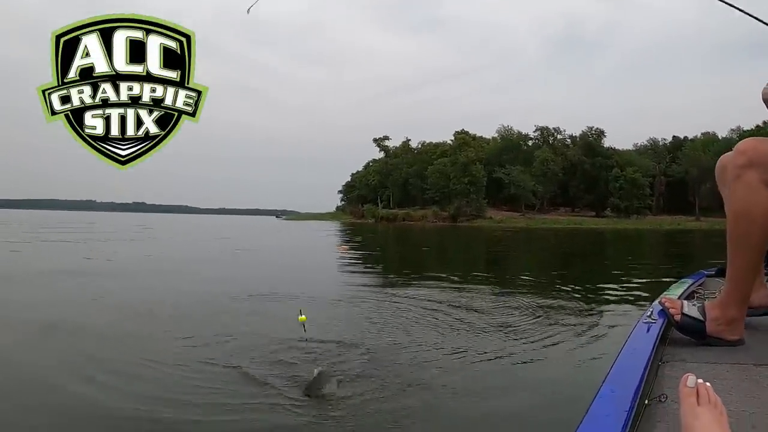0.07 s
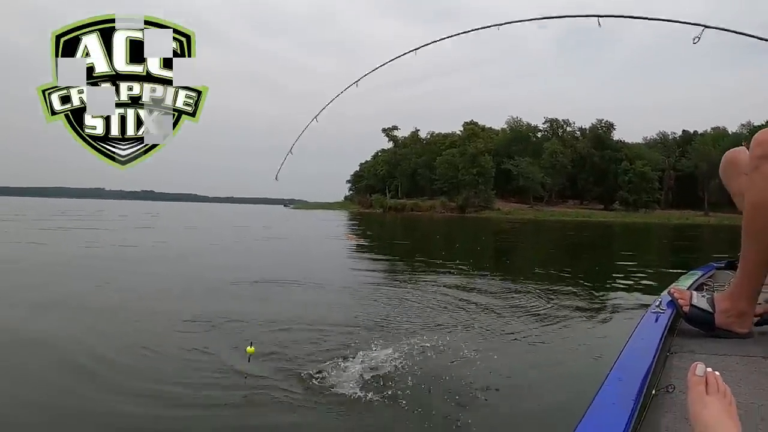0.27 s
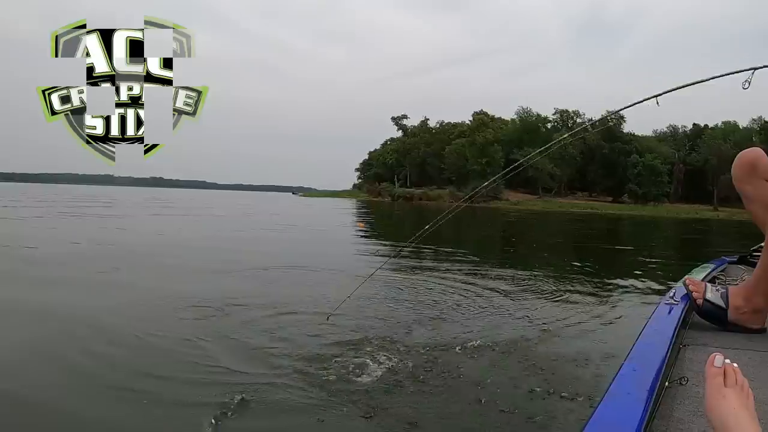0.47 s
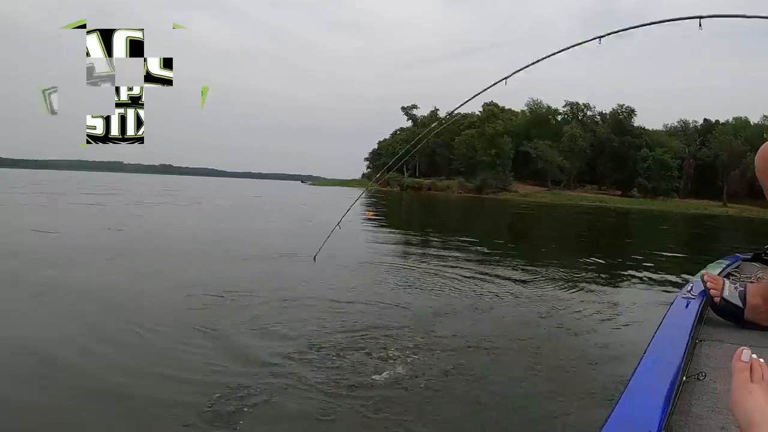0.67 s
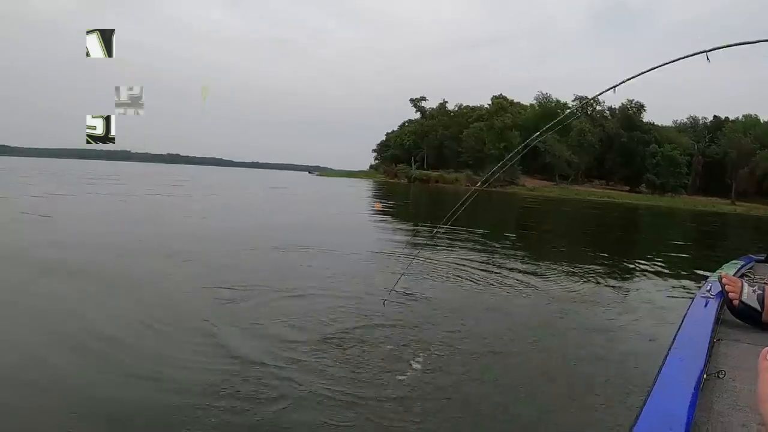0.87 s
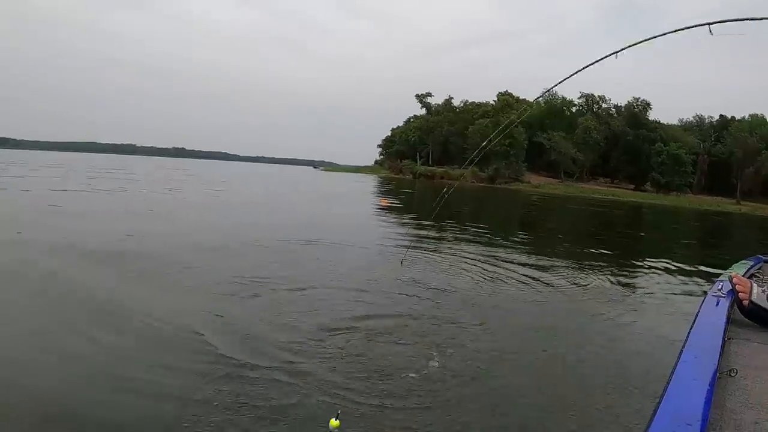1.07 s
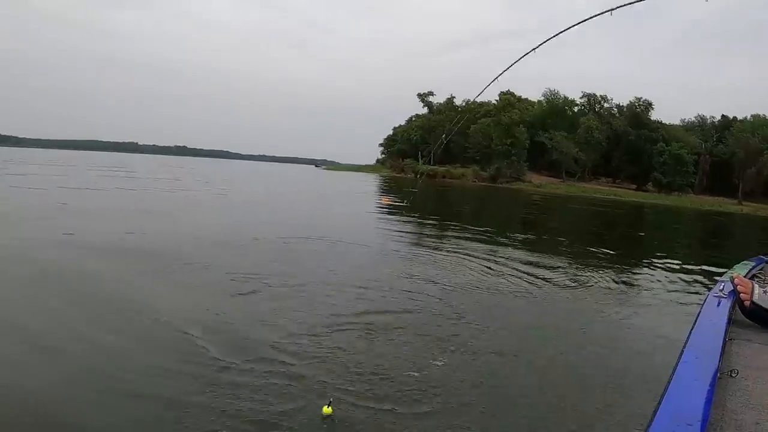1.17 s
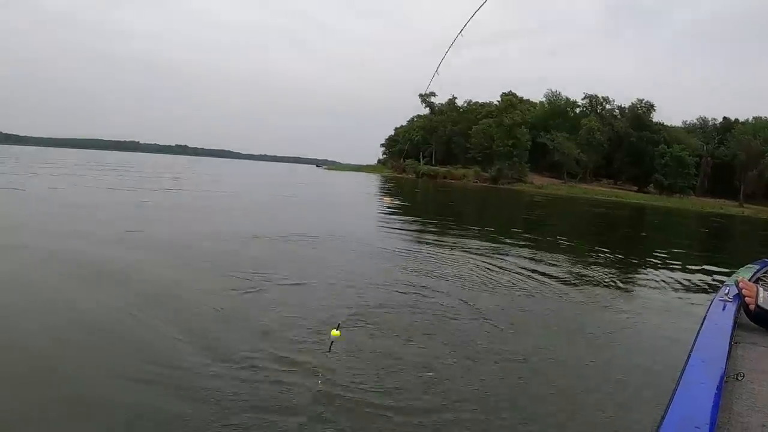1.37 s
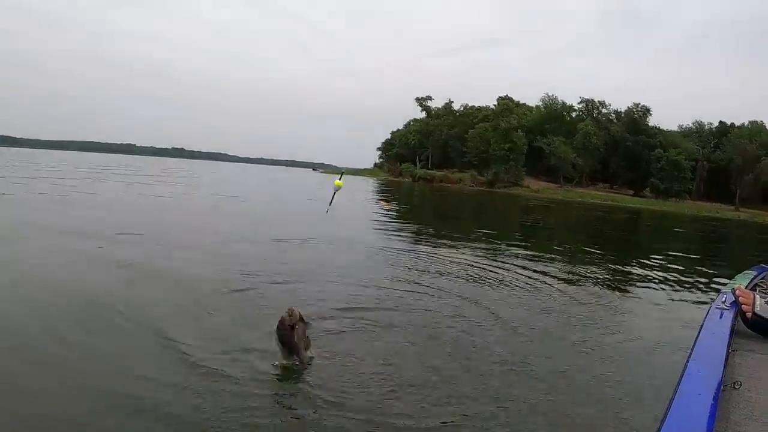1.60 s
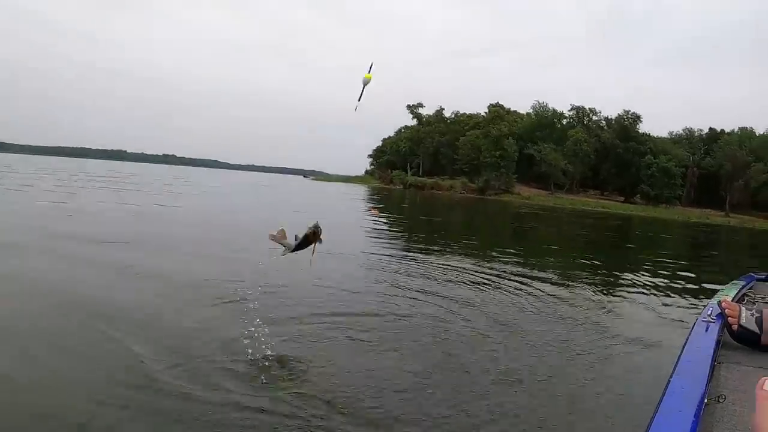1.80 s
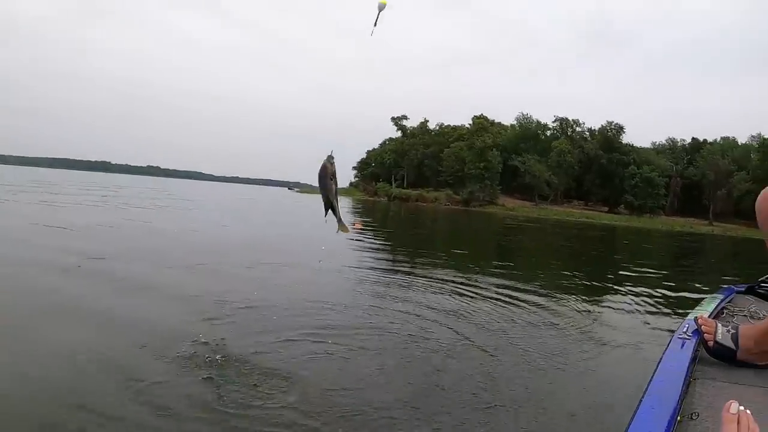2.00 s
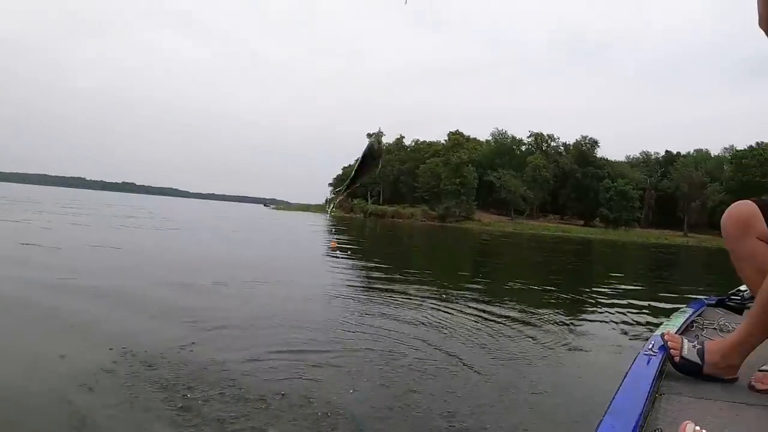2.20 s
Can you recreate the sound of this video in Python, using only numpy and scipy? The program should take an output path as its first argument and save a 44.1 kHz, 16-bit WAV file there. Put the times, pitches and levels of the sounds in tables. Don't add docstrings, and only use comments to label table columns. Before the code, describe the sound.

A hooked fish thrashes with hard watery slaps, then line squeaks, float snaps and drips fall

```python
import sys
import numpy as np
from scipy import signal
from scipy.io import wavfile

SR = 44100
rng = np.random.default_rng(int(sys.argv[2]) if len(sys.argv) > 2 else 0)


def dump_mix(stems):
    frames = np.atleast_2d(stems).T
    limited = np.clip(frames, -1, 1)
    pcm = np.round(limited * 32767).astype(np.int16)
    wavfile.write(sys.argv[1], SR, pcm)


def natural_amplitude(level_db):
    exponent = np.asarray(level_db, float) / 20
    return 10 ** exponent


N = 99225

# [t/s, level/dB]
GUSTS = [(0, -74), (.2, -69), (.28, -76), (.55, -80), (.75, -67), (.9, -48.5), (1.12, -59), (1.22, -63.5),
         (1.32, -60.5), (1.55, -58), (1.8, -72), (2.0, -64.5), (2.09, -58.5), (2.25, -58)]
# [f/Hz, level/dB per Hz]
AIR_COLOUR = [(71, -35), (120, -12), (188, -4), (519, -22), (1350, -24.5), (9320, -36.5), (15500, -57.5)]
# [t/s, level/dB, treble level/dB]
CHURN = [(0, -64, -24), (.228, -59.5, -1.5), (.255, -36.5, 1), (.3, -39, 4.5), (.34, -38.5, -5.5),
         (.42, -40, -5), (.51, -38.5, -0.7), (.63, -43.5, 0), (.675, -52, -13.5), (.78, -51, -1),
         (.87, -59, -3), (1.3, -68, -1), (1.45, -75.5, 0), (1.71, -76.5, -13), (1.92, -59.5, -4),
         (2.08, -80.5, 3), (2.14, -68.5, -4), (2.25, -72.5, -8)]
# [f/Hz, level/dB per Hz]
SPRAY_COLOUR = [(150, -51.5), (250, -8), (499, -5.5), (573, -0.5), (3390, -1.5), (6500, -13), (10100, -12),
                (15500, -35.5)]
# [centre t/s, half width t/s, level/dB]
SHOWERS = [
    (0.296, 0.038, -47),
    (0.501, 0.034, -45.5),
    (1.988, 0.15, -65.5),
]
# [t/s, peak level/dB, centre f/Hz]
TICKS = [(1.353, -53, 2770), (1.461, -59.5, 9060), (1.482, -55.5, 6000), (1.535, -55.5, 8800),
         (1.632, -61, 7000), (1.831, -54, 7800), (2.089, -55, 6000), (2.132, -63, 8000),
         (2.229, -56.5, 6940), (1.721, -52, 6870), (1.787, -46, 8600), (1.878, -45.5, 6500),
         (1.9, -43, 6100), (1.94, -40.5, 5500), (1.993, -31.5, 6480), (2.039, -55, 7400),
         (2.057, -44, 5830), (2.156, -54, 6000), (2.186, -54, 6940), ]
# [t/s, f/Hz, peak level/dB, t60 t/s]
DRIPS = [(0.167, 2900, -60, 0.93), (1.725, 2593, -65, 0.43), (1.761, 2060, -58, 0.009),
         (1.794, 1267, -55, 0.022), (1.795, 4300, -59, 0.026), (1.812, 1850, -53.5, 0.042),
         (1.868, 2030, -53.5, 0.019), (1.876, 1470, -50.5, 0.12), (1.903, 2370, -43.5, 0.021),
         (1.91, 1368, -41, 0.025), (1.93, 1594, -52, 0.062), (1.941, 3280, -45, .025),
         (1.95, 4720, -50.5, 0.011), (1.962, 3200, -50.5, .012), (1.96, 1910, -47.5, 0.073),
         (2.039, 4480, -46.5, 0.019), (2.007, 4520, -51.5, .01), (2.017, 5800, -54, 0.011),
         (2.029, 4000, -51, 0.0077), (2.055, 4770, -50.5, .012), (2.064, 4110, -51, 0.031),
         (2.096, 4200, -57, .015), (2.104, 3680, -56.5, 0.012), (2.179, 4300, -58, 0.031),
         (2.229, 4800, -63, 0.023), (2.156, 2630, -45, 0.013)]
# [t/s, f/Hz, level/dB]
SQUEAK = [(.772, 2184, -62), (.79, 3090, -47), (.8, 3820, -34.5), (.803, 4250, -40), (.818, 5440, -52.5),
          (.835, 5500, -54.5), (.845, 6100, -69)]
# [t/s, f/Hz, level/dB]
CHIRP = [(.767, 3400, -56), (.773, 3700, -43), (.78, 4900, -47), (.786, 6300, -56)]
# [t/s, peak level/dB, pulse f/Hz]
SNAP = (1.3629, -15.5, 2860)
# [f/Hz, level/dB, t60 t/s]
FLOAT_MODES = [(2300, -44, 0.058), (5040, -49, 0.024), (8400, -25.5, 0.0085), (10080, -22.5, 0.0051)]
# [t/s, length t/s, start f/Hz, end f/Hz, level/dB]
GURGLES = [(0.522, 0.14, 345.6, 690, -51.5), (0.646, 0.045, 287, 527, -53), (0.723, 0.069, 452.7, 790, -55),
           (0.901, 0.028, 535, 840, -49)]
# [t/s, length t/s, lowest f/Hz, highest f/Hz, level/dB]
CLOUDS = [(0.243, 0.023, 724, 2290, -44.5), (0.292, .018, 661, 2380, -24), (0.314, 0.025, 794, 2300, -24.5),
          (0.359, 0.00798, 1085, 1850, -29.5), (0.379, 0.069, 410, 1670, -34),
          (0.472, 0.056, 940, 2510, -35), (0.535, 0.064, 940, 2040, -44), (0.696, .14, 890, 2200, -51),
          (1.823, .2, 1370, 5940, -55)]
# [t/s, f/Hz, peak level/dB, t60 t/s]
POCKETS = [(0.255, 192, -37, 0.02), (0.276, 2280, -17.5, 0.0028), (0.289, 1311, -21.5, 0.013),
           (.294, 773, -14.5, 0.054), (.304, 836, -16.5, 0.015), (0.313, 1560, -15.5, 0.011),
           (0.317, 1300, -17, 0.055), (0.323, 433.5, -31.5, 0.025), (0.324, 973, -24.5, 0.023),
           (0.337, 614, -18.5, 0.02), (.342, 511.4, -20.5, 0.08), (0.358, 1460, -22, 0.08),
           (0.425, 232, -38.5, 0.023), (0.433, 908, -33, 0.026), (.499, 740, -33.5, 0.018),
           (.587, 1600, -31.5, 0.011), (0.628, 1740, -23, 0.0098), (0.702, 463, -48, 0.013),
           (0.725, 1570, -45, 0.02), (0.768, 1480, -46, 0.024), (0.799, 1070, -50, 0.087),
           (.824, 1320, -40.5, 0.014), (.907, 1850, -48.5, 0.042), (0.93, 1240, -48.5, 0.047),
           (1.167, 3320, -50, 0.032), (1.206, 1382, -46.5, 0.036), (1.364, 1350, -35, 0.038),
           (.49, 1400, -41, .02), (.515, 1860, -33.5, 0.013), (0.562, 1150, -46, 0.024),
           (.61, 628, -38, 0.02), (0.518, 361, -37.5, 0.026)]
# [t/s, f/Hz, peak level/dB, t60 t/s, rise octaves/s]
BLOOPS = [(.357, 553, -27.5, 0.033, 28), (.39, 891, -32, 0.11, 25), (.409, 618.4, -24.5, 0.079, 18),
          (.443, 337, -36.5, 0.044, 13), (.628, 708, -28, 0.023, 12.5), (.726, 880, -55.5, 0.054, -3),
          (.812, 720, -55.5, 0.048, 16), (.930, 485, -48, 0.089, 3.5), (1.002, 651, -41.5, 0.093, 21),
          (1.015, 527, -46.5, 0.11, 13.5), (1.14, 650, -53.5, 0.17, 8), (1.148, 1066, -52.5, 0.11, 17),
          (1.376, 1766, -41.5, 0.024, 29.5), (.822, 121, -46, 0.039, 5), (.9, 60.5, -52, 0.058, -2),
          (1.203, 4170, -40.5, .012, -29.5)]
# [t/s, peak level/dB, centre f/Hz, t60 t/s]
SLAPS = [(.2375, -14.5, 3890, 0.012), (.2375, -21.5, 9100, 0.013), (.276, -21.5, 2980, 0.017),
         (.2375, -21, 1630, 0.022), (.294, -18, 2730, 0.012), (.319, -23.5, 3460, 0.046),
         (.391, -53, 4150, 0.01), (.502, -30.5, 2350, 0.019), (.521, -23.5, 1560, 0.0092),
         (.628, -25, 1270, 0.025), (.653, -36.5, 4800, 0.017), (.857, -40, 5500, 0.0081),
         (1.204, -43.5, 3240, 0.0089), (1.364, -33.5, 3560, 0.0083), (1.3755, -43.5, 3300, 0.0079),
         (1.376, -44, 9500, 0.0043), (1.001, -47.5, 1700, 0.045), (1.151, -66.5, 2540, .01), ]

FIZZ_DB, SPREAD_DB = -8, -10.5


def in_time(rows):
    s, *columns = np.transpose(rows)
    return [np.interp(np.arange(N) / SR, s, c) for c in columns]


def rms_one(x):
    return x / np.sqrt(np.mean(x ** 2) + 1e-20)


def drift(rate_hz):
    r = np.exp(-2 * np.pi * rate_hz / SR)
    settle = 9000
    noise = rng.standard_normal(N + settle)
    return rms_one(signal.lfilter([1], [1, -2 * r, r * r], noise)[settle:])


def filtered(x, order, hz, kind="low"):
    return signal.sosfilt(signal.butter(order, hz, kind, fs=SR, output="sos"), x)


def resonate(x, hz, width_hz):
    r = np.exp(-np.pi * width_hz / SR)
    top = np.array([1, 0, -1]) * (1 - r * r) / 2
    return signal.lfilter(top, [1, -2 * r * np.cos(2 * np.pi * hz / SR), r * r], x + 1e-18)


def add(out, s, x):
    i = int(s * SR)
    out[i:i + len(x)] += x[:N - i]


def banded_noise(colour, patchy_db, rate_hz, own_db):
    out, together = 0, drift(rate_hz)
    edges = 110 * 2 ** np.arange(0, 7.6, 0.5)
    white = rng.standard_normal((2, 2, N))
    hz, db = np.transpose(colour)
    for k, (low, high) in enumerate(zip(edges, edges[1:])):
        band = filtered(white[k % 2], 2, [low, high], "band")
        level_db = np.interp(np.log(low * high) / 2, np.log(hz), db)
        out = out + natural_amplitude(level_db + patchy_db * (together + drift(rate_hz))) * band
    return rms_one(out) * natural_amplitude([[0], [own_db]])


def wind():
    alike, right_db = 0.29, -7
    a, b = (filtered(rng.standard_normal(N), 2, [18, 65], "band") * natural_amplitude(3 * drift(7)) for _ in "LR")
    right = rms_one(alike * a + (1 - alike) * b)
    return natural_amplitude(in_time(GUSTS)[0] - 3.5) * np.array([rms_one(a), natural_amplitude(right_db) * right])


def open_air():
    return natural_amplitude(-68) * banded_noise(AIR_COLOUR, patchy_db=1.16, rate_hz=52, own_db=-0.5)


def falling_spray(churn, treble_db):
    spray, side = churn * natural_amplitude(-1) * banded_noise(SPRAY_COLOUR, patchy_db=2.0, rate_hz=45, own_db=SPREAD_DB)
    lows = filtered(spray, 3, 3750)
    return lows + (spray - lows) * natural_amplitude(treble_db), side


def fizz():
    per_s, cycles, sizes_count = 1400, 12, 24
    strength = natural_amplitude(4.5 * np.minimum(rng.exponential(1, N), 5)) * rng.choice([-1, 1], N)
    born = rng.random(N) < per_s * natural_amplitude(5 * drift(25)) / SR
    dealt = rng.integers(0, sizes_count, N)
    hz, db = np.transpose(SPRAY_COLOUR)
    out = np.zeros(N)
    for k, pitch in enumerate(np.geomspace(500, 11000, sizes_count)):
        gain = natural_amplitude(np.interp(np.log(pitch), np.log(hz), db))
        out += gain * resonate(strength * born * (dealt == k), pitch, 1.8 * pitch / cycles)
    return rms_one(out)


def patter():
    per_s, cycles, centre_hz = 400, 22, 4500
    t = np.arange(N) / SR
    hits = natural_amplitude(4 * np.minimum(rng.exponential(1, N), 3.5)) * (rng.random(N) < per_s / SR)
    dealt = rng.integers(0, 12, N)
    drops = np.zeros(N)
    for k, pitch in enumerate(centre_hz * 2 ** np.linspace(-1.3, 1.3, 12)):
        ring = resonate(hits * (dealt == k), pitch, 3 * pitch / cycles)
        drops += resonate(ring, pitch, pitch) / np.sqrt(pitch)
    swell = sum(natural_amplitude(db) * np.exp(-((t - s) / width) ** 2) for s, width, db in SHOWERS)
    return rms_one(drops) * swell


def squeak(rows):
    (first_s, first_hz, _), (last_s, last_hz, _) = rows[0], rows[-1]
    faded = [(first_s - 0.003, first_hz, -110), *rows, (last_s + 0.0048, last_hz, -110)]
    hz, db = in_time(faded)
    phase = 2 * np.pi * np.cumsum(hz) / SR
    return natural_amplitude(db + 3 * drift(150)) * (np.sin(phase) + natural_amplitude(-19.5) * np.sin(2 * phase))


def float_snap():
    out, t = np.zeros(N), np.arange(SR // 20) / SR
    s, db, pulse_hz = SNAP
    u = t * pulse_hz - 1
    add(out, s - 1 / pulse_hz, natural_amplitude(db) * np.exp(-(2.0 * (u - 0.6)) ** 2) * np.sin(2 * np.pi * u))
    for hz, level_db, t60 in FLOAT_MODES:
        add(out, s + 1 / pulse_hz, natural_amplitude(level_db - 60 * t / t60) * np.sin(2 * np.pi * hz * t))
    return out


def gurgles():
    out = np.zeros(N)
    for s, length, from_hz, to_hz, db in GURGLES:
        u = np.arange(int(length * SR)) / (length * SR)
        pitch = from_hz * (to_hz / from_hz) ** (u ** 2.2)
        tone = np.sin(2 * np.pi * np.cumsum(pitch) / SR)
        add(out, s, natural_amplitude(db) * np.sin(np.pi * u) ** 0.3 * tone)
    return out


def clouds():
    ring_cycles, rise, spread_db = 8.1, 4.4, 5
    rows = []
    for (s, length, low, high, db), chances in zip(CLOUDS, rng.random((len(CLOUDS), 16, 3))):
        for when, size, strength in chances:
            hz = low * (high / low) ** size
            level_db = db + spread_db * (strength - 0.5)
            rows.append((s + length * when, hz, level_db, ring_cycles / hz, rise))
    return pockets(rows)


def pockets(rows):
    attack_cycles, wobble, flutter_db = 1.6, 0.03, 2.5
    out, t = np.zeros(N), np.arange(SR // 6) / SR
    shake, flutter = drift(210), drift(118)
    for k, (s, hz, db, t60, rise) in enumerate(rows):
        start = k * 1500 % 90000
        own = slice(start, start + len(t))
        pitch = hz * 2 ** np.minimum(rise * t, 1.5) * (1 + wobble * shake[own])
        attack = (1 - np.exp(-t * hz / attack_cycles)) ** 2
        shape = attack * natural_amplitude(-60 * t / t60 + flutter_db * flutter[own])
        add(out, s, natural_amplitude(db) * shape / shape.max() * np.sin(2 * np.pi * np.cumsum(pitch) / SR))
    return out


def slaps(rows):
    attack_s = 0.00057
    out, t = np.zeros(N), np.arange(SR // 15) / SR
    for (s, db, hz, t60), noise in zip(rows, rng.standard_normal((len(rows), len(t)))):
        burst = noise * (1 - np.exp(-t / attack_s)) * natural_amplitude(-60 * t / t60)
        burst = resonate(resonate(burst, hz, hz), hz, 0.5 * hz)
        add(out, s - attack_s, natural_amplitude(db) * burst / abs(burst).max())
    return out


def scatter(x):
    t = np.arange(SR // 100) / SR
    burst = rms_one(rng.standard_normal(len(t)) * np.exp(-t / 0.004)) / np.sqrt(len(t))
    return natural_amplitude(-8) * signal.fftconvolve(filtered(x, 1, 1200, "high"), burst)[:N]


def shaded(water):
    presence_hz = 3530
    presence = natural_amplitude(-13.5) * resonate(water, presence_hz, presence_hz)
    return natural_amplitude(1) * filtered(water + presence, 1, 5500)


def scene():
    churn_db, treble_db = in_time(CHURN)
    churn = natural_amplitude(churn_db)
    air, air_side = open_air()
    spray, spray_side = falling_spray(churn, treble_db)

    rising = [(*p, 4.5) for p in POCKETS + DRIPS]
    rings = pockets(rising + BLOOPS) + clouds() + gurgles()
    rings = rings + float_snap() + squeak(SQUEAK) + squeak(CHIRP)
    ticks = [(*tick, 0.006) for tick in TICKS]
    water = rings + slaps(SLAPS + ticks) + churn * natural_amplitude(FIZZ_DB) * fizz() + patter()
    hull_echo = natural_amplitude(-17.5) * np.roll(water, int(0.0052 * SR))
    water = filtered(water + hull_echo + spray, 2, 45, "high")

    side = scatter(water - spray) + spray_side + air_side
    side = side + churn * natural_amplitude(FIZZ_DB + SPREAD_DB) * fizz()
    return np.array([shaded(water) + air + side, water + air - side]) + wind()


def band_limit(x):
    return signal.sosfilt(signal.butter(12, 15760, fs=SR, output="sos"), x)


def record(dry):
    steep = signal.sosfilt(signal.cheby2(12, 70, 16250, fs=SR, output="sos"), dry)
    return band_limit(filtered(steep, 2, 14400))


dry = scene()
out = record(dry)
dump_mix(out)
```